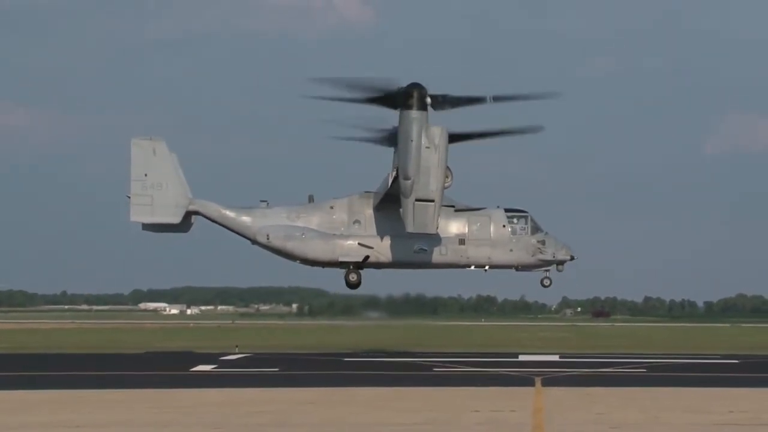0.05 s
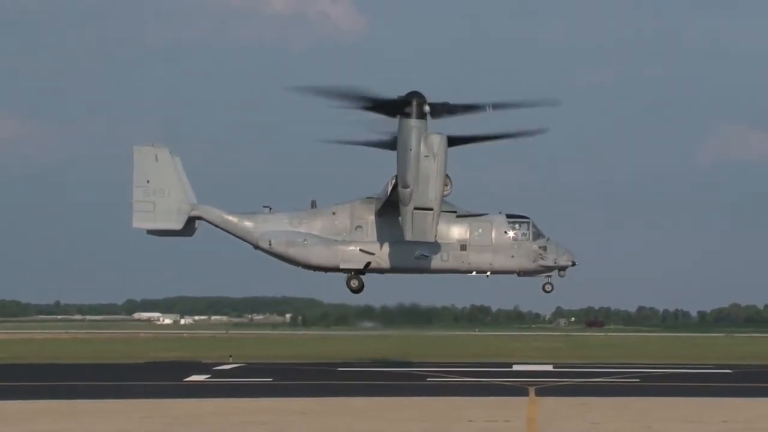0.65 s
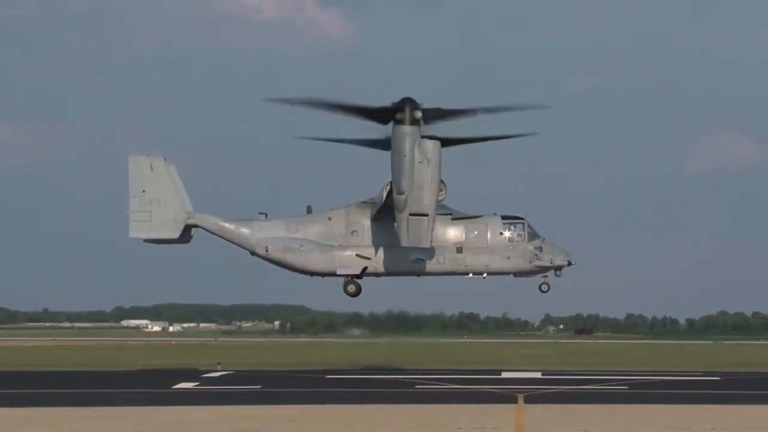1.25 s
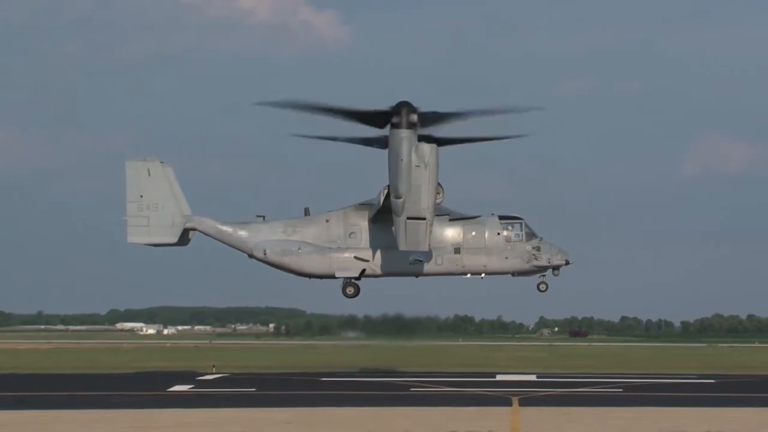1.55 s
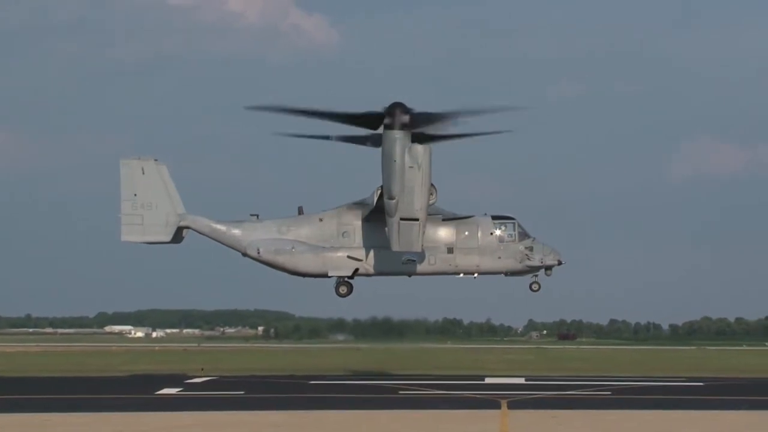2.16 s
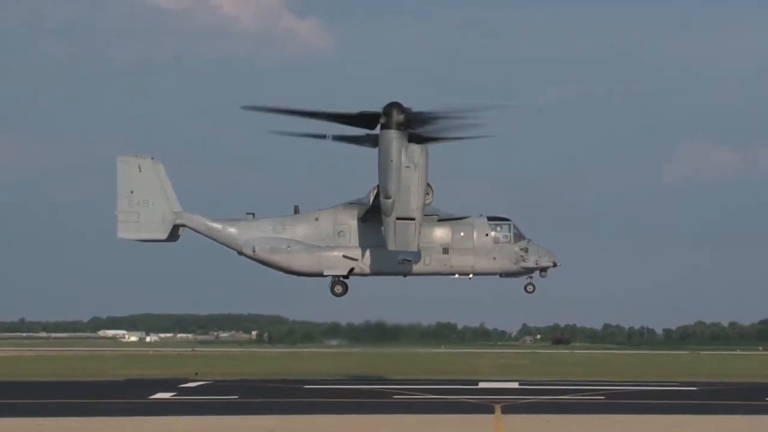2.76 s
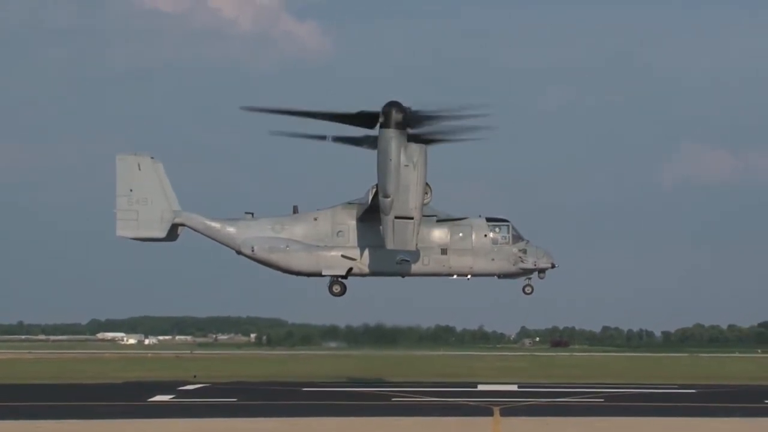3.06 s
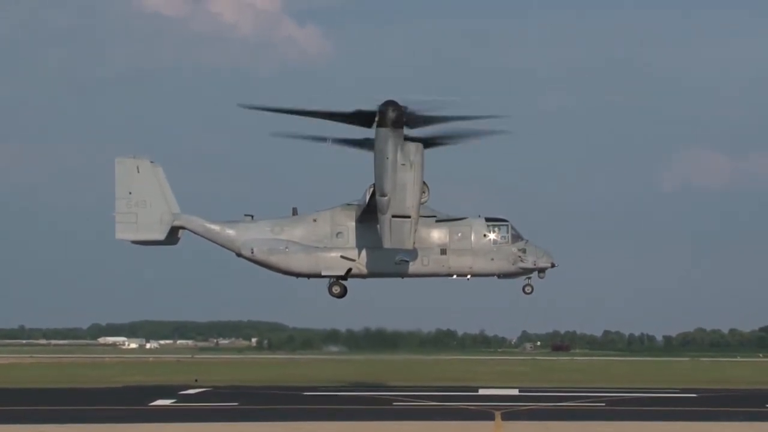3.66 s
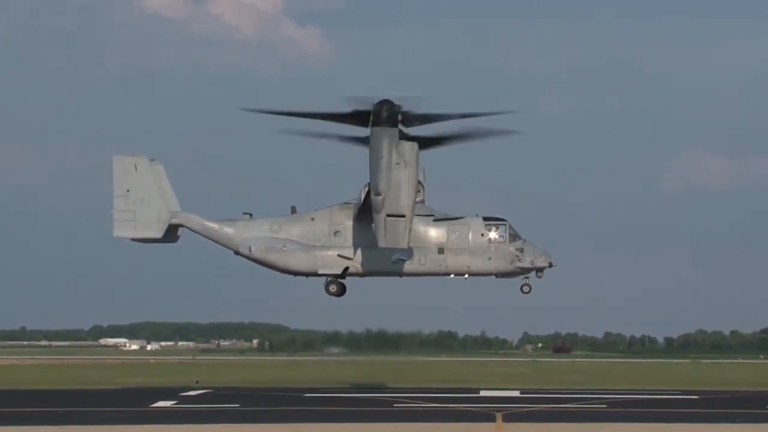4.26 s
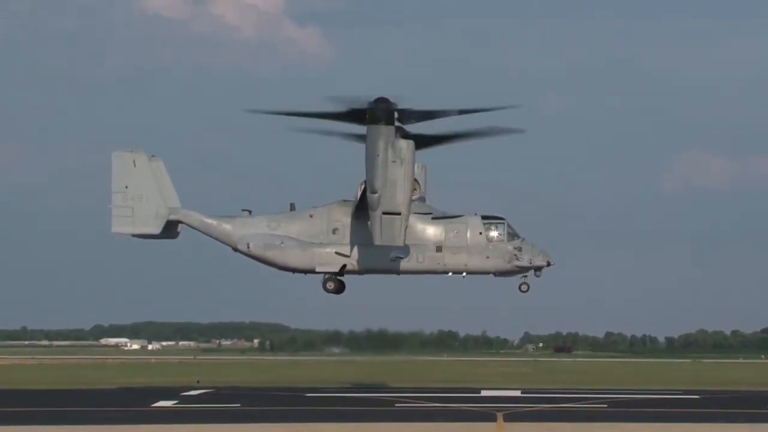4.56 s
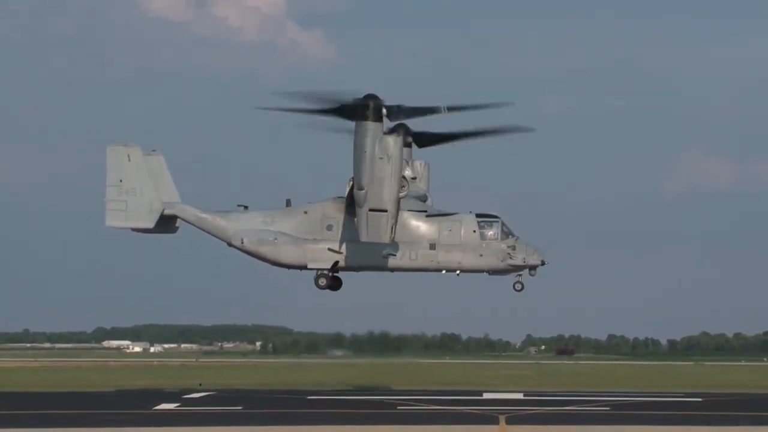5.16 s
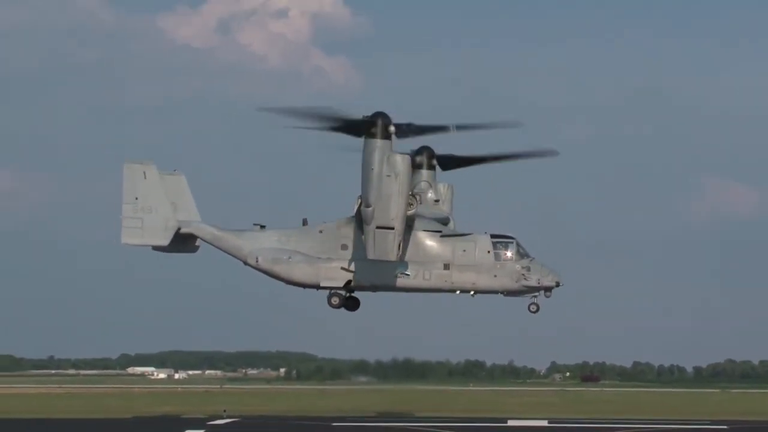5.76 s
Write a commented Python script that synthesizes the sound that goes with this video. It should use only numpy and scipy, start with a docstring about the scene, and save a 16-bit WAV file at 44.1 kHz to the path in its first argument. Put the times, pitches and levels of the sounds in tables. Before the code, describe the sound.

Heavy, rapid rotor chop and hissing turbines from a hovering aircraft, with its downwash rumbling on the microphone.

```python
"""A deep, fast thrum comes first: a tiltrotor hovering low over an airfield, some way off.
Its blades thrum and swish about twenty times a second, and slap when they cut their own tip
vortices (the whirls of air that blade tips leave behind). The turbines hiss above the roar of
the wake, and gusts of downwash, the air the rotors blow down, buffet the microphone."""
import sys
import numpy as np
from scipy import signal
from scipy.fft import rfft, irfft
from scipy.io import wavfile
from scipy.ndimage import uniform_filter1d

SR = 44100
rng = np.random.default_rng(int(sys.argv[2]) if len(sys.argv) > 2 else 0)


def pcm_store(signal):
    """Save signal as 16-bit PCM."""
    levels = np.round(np.clip(np.atleast_2d(signal), -1, 1) * 32767)
    wavfile.write(sys.argv[1], SR, levels.astype(np.int16).T)


N = 264600
TIME = np.arange(N) / SR
BLADE_HZ = 19.7  # blade passes a second


def amp(db):
    """Turns decibels into a gain."""
    return 10 ** (np.asarray(db) / 20)


def unit_rms(x):
    """Scales a signal so that its average strength (rms) is 1."""
    return x / np.sqrt(np.mean(x ** 2) + 1e-20)


def follow(rows, column=1):
    """Turns one dB column of a timed table into a gain for every sample."""
    rows = np.asarray(rows)
    return amp(np.interp(TIME, rows[:, 0], rows[:, column]))


def noise(colour, repeat=0.):
    """Noise with the given spectrum; the share `repeat` comes again with the next blade."""
    hz, db = np.transpose(colour)
    freqs = np.fft.rfftfreq(N, 1 / SR)
    gain = amp(np.interp(np.log(freqs + 1), np.log(hz), db))
    comb = 1 / (1 - repeat * np.exp(-2j * np.pi * freqs / BLADE_HZ))
    return unit_rms(irfft(rfft(rng.standard_normal(N)) * gain * comb, N))


def wander(rate_hz):
    """A smooth random wobble, up to about the given rate."""
    hz = np.fft.rfftfreq(N, 1 / SR)
    return unit_rms(irfft(rfft(rng.standard_normal(N)) * np.exp(-(hz / rate_hz) ** 2), N))


def blade_passes(start=0.2822, sway=0.047):
    """A running count of blade passes; the path to the microphone sways a little."""
    return BLADE_HZ * TIME + start + sway * wander(1.83)


def swish(passes, depth_db, flutter_db, flutter_hz):
    """A gain that swells as each blade comes round and flutters with the rough air."""
    return unit_rms(amp(depth_db * np.cos(2 * np.pi * passes) + flutter_db * wander(flutter_hz)))


# The downwash at the microphone. Each row: time in seconds, strength in dB.
GUST_LEVELS = [(0.0, -29), (0.25, -23.5), (0.45, -31.5), (0.65, -21.5), (0.78, -24.5), (1.12, -21.5),
               (1.17, -17.5), (2.05, -18.5), (2.21, -31.5), (2.32, -16.5), (2.52, -21.5), (2.65, -18.5),
               (3.1, -17.5), (3.3, -19), (3.55, -17.5), (3.65, -28.5), (4.0, -19.5), (4.1, -23.5),
               (4.38, -16), (4.5, -19.0), (5.2, -15.5), (5.5, -15), (6.0, -23)]
# The tone of big and of small eddies (swirls of air). Each row: frequency in Hz, relative level in dB.
BIG_EDDY_TONE = [(10, -44), (25, -14), (45, -2), (68, 4.5), (96, -0.5), (125, -8), (200, -31), (330, -32.5),
                 (700, -42.5), (2000, -88)]
SMALL_EDDY_TONE = [(60, -10), (110, 6), (180, 5), (260, -5.5), (400, -27), (1500, -75)]


def buffet(passes, level_db=-1, still_db=-29.0, small_db=-8.5, strong_db=-17):
    """Eddies push on the microphone in time with the blades; a strong gust breaks into smaller ones."""
    gust = follow(GUST_LEVELS)
    small = noise(SMALL_EDDY_TONE) * unit_rms(amp(3.7 * wander(44)))  # they come in clumps
    eddies = noise(BIG_EDDY_TONE) + amp(small_db) * gust / amp(strong_db) * small
    power = uniform_filter1d(eddies ** 2, size=3600)
    eddies = unit_rms(eddies / np.sqrt(power))  # eddies of one gust are alike in strength
    shedding = 1 / (1 + (amp(still_db) / gust) ** 4)  # light air sheds no eddies
    pulse = swish(passes, depth_db=1.2, flutter_db=1.3, flutter_hz=18)
    return amp(level_db) * gust * shedding * eddies * pulse


# The largest eddies strike the microphone one by one.
# Each row: time of the peak in seconds, relative level in dB, pitch in Hz.
THROB_HITS = [(0.799, -9, 83), (1.023, -6.5, 63.6), (1.167, -3.5, 97), (1.253, -7, 80), (1.293, -5, 65),
              (1.381, -7, 105), (1.569, -3, 72.4), (1.799, -9.0, 88.5), (2.058, -5.5, 92.6),
              (2.329, -13, 97), (2.666, -4.5, 86), (2.734, -7.5, 75.4), (2.78, -6, 78), (2.82, -7, 100),
              (2.994, -3, 65), (3.465, -6.5, 84.5), (3.537, -3, 88.5), (4.394, -5.5, 77.6),
              (4.48, -8.5, 82), (4.883, -4, 76), (4.926, -8.5, 75.6), (5.008, -12, 80), (5.068, -7, 80),
              (5.157, -5, 88), (5.209, -7.5, 88), (5.42, -5, 80.4), (5.491, -6, 83), (5.526, -6, 104),
              (5.751, -8, 71)]


def add_throbs(eddies, level_db=-3.5, cycles=0.94, pushed_aside=0.27):
    """Each large eddy rocks the pressure for a few cycles and pushes the smaller eddies aside."""
    out = eddies.copy()
    for peak_s, db, hz in THROB_HITS:
        near = abs(TIME - peak_s) < .05
        age = TIME[near] - peak_s
        swell = np.exp(-(hz * age / cycles) ** 2)
        out[near] *= 1 - pushed_aside * swell
        out[near] += amp(db + level_db) * swell * np.cos(2 * np.pi * hz * age)
    return out


# The tone of the turbines. Each row: frequency in Hz, relative level in dB.
HISS_TONE = [(700, 3.5), (1350, -3.5), (1880, 4.5), (2350, 0), (4200, -0.5), (6000, -4.5), (6650, -1.5),
             (7250, -2), (8100, -11.5), (8800, -12.5), (9800, -18), (11600, -21.5), (12800, -27),
             (15500, -39)]


def turbines(passes, level_db=4.5):
    """The exhaust hisses, with a broad compressor whistle near 7 kHz."""
    hiss = amp(level_db) * noise(HISS_TONE)
    return hiss * swish(passes, depth_db=-0.6, flutter_db=1.16, flutter_hz=45.0)


def rasp(passes, per_s=110, spread_db=3.0, width_s=0.00031):
    """Small vortices flick the blades of both rotors: sharp dips that bunch twice in every pass."""
    chance = per_s / SR * (1 + np.cos(4 * np.pi * passes))
    hits = rng.random(N) < chance
    strength = amp(spread_db * np.minimum(rng.exponential(1, N), 2))
    offset = np.arange(-SR // 200, SR // 200) / SR / width_s
    dip = (2 * offset ** 2 - 1) * np.exp(-offset ** 2)
    return unit_rms(signal.oaconvolve(hits * strength, dip, "same"))


# How rough the air at the blades is. Each row: time in seconds, relative roar and churn levels in dB.
WAKE_LEVELS = [(0.0, 5.5, 11.5), (0.62, 8, 16), (0.92, 8, 15), (1.06, 10.5, 12.5), (1.63, 9, 15),
               (2.2, 6.5, 7.5), (2.77, 5, 16.5), (2.92, 9, 12), (3.09, 6.5, 18.5), (3.26, 8, 14),
               (3.81, 8, 20), (3.98, 9.5, 15), (4.16, 8, 13.5), (4.53, 8.5, 12.5), (5.16, 7.5, 18.5),
               (5.48, 4.5, 19), (6.0, 10.5, 18.5)]
# As the aircraft drifts, the blades meet the wake earlier or later in their sweep.
# Each row: time in seconds, delay as a share of one pass.
WAKE_DELAY = [(0.0, 0.35), (0.9, 0.4), (2.3, 0.58), (3.3, 0.88), (6.0, 0.77)]
# The tone of the churn and of the roar. Each row: frequency in Hz, relative level in dB.
CHURN_TONE = [(40, -34), (110, -13.5), (155, -8.5), (205, -2), (260, 2), (380, -1.5), (550, -11),
              (900, -35), (2000, -62)]
ROAR_TONE = [(100, -9), (300, 2.5), (520, 2.5), (730, 0.5), (1020, -3), (1500, -11), (2400, -16),
             (4000, -19.5), (8000, -29.5), (15000, -52)]


def wake(passes, churn_db=-1, roar_db=2.0, rasp_db=-10.5):
    """Rough air over the blades makes a throbbing low churn, a broad roar and a rasp."""
    meeting = passes - np.interp(TIME, *np.transpose(WAKE_DELAY))
    churn = noise(CHURN_TONE, repeat=0.49)
    churn *= swish(meeting, depth_db=2.3, flutter_db=1.5, flutter_hz=44.5)
    roar = noise(ROAR_TONE, repeat=0.13)
    roar *= swish(meeting, depth_db=1.6, flutter_db=1.13, flutter_hz=55)
    broad = amp(roar_db) * roar + amp(rasp_db) * rasp(passes)
    return follow(WAKE_LEVELS) * broad + amp(churn_db) * follow(WAKE_LEVELS, column=2) * churn


# How loud the raspy edge of the chop is. Each row: time in seconds, level in dB.
EDGE_LEVELS = [(0.0, -40.5), (0.6, -44), (1.2, -46), (1.35, -75), (3.7, -54), (3.95, -40), (4.4, -60),
               (6.0, -58)]
# Its tone. Each row: frequency in Hz, relative level in dB.
EDGE_TONE = [(600, -32), (1300, 9), (2000, 1), (2800, 3), (6000, -36.5)]


def chop_edge(passes):
    """A raspy edge on the chop comes in bursts from each of the two rotors in turn."""
    edge = follow(EDGE_LEVELS) * noise(EDGE_TONE)
    return edge * swish(2 * passes + 0.22, depth_db=2.0, flutter_db=2.5, flutter_hz=70)


# A blade only grazes a vortex. Each row: time of the peak in seconds, level in dB, pitch in Hz.
GRAZES = [(0.019, -29.5, 1440), (0.073, -31, 1470), (.428, -29, 2000), (0.637, -28.5, 1690),
          (.924, -27, 694), (1.063, -28, 617), (1.236, -24, 890), (4.586, -24, 600), (4.985, -25, 586)]


def zips(half_length_s=0.0049, rise_per_s=17):
    """Short, rough whistles glide upwards as the blade sweeps through; low ones are more of a chuff."""
    out = np.zeros(N)
    roughness = wander(310)
    for peak_s, db, hz in GRAZES:
        near = abs(TIME - peak_s) < .02
        age = TIME[near] - peak_s
        phase = 2 * np.pi * hz * (1 + rise_per_s * age / 2) * age + roughness[near]
        out[near] += amp(db) * np.exp(-(age / half_length_s) ** 2) * np.sin(phase)
    return out


# The tone of the blades' thuds. Each row: frequency in Hz, relative level in dB.
THUD_TONE = [(70, -23), (125, 1.5), (190, -1), (290, -23), (700, -52)]


def thuds(passes, level_db=9.5):
    """Air flows in unevenly, so each blade's low thump is rough and unlike the last."""
    rumble = amp(level_db) * noise(THUD_TONE)
    return rumble * swish(passes, depth_db=2.3, flutter_db=2.6, flutter_hz=17)


# The low notes of the thrum. Each row: multiple of the blade rate, relative level in dB.
THRUM_NOTES = [(2, -1), (3, 6.5), (4, 4), (5, -10.5), (6, -0.5), (7, -3), (8, -6.5), (9, -6), (10, -13),
               (11, -9), (12, -16)]


def thrum(passes, level_db=14.5, waver_db=1.5, scatter=0.42):
    """The blades push on the air: low notes bunch into a thump and waver as the air moves."""
    notes = np.zeros(N)
    for multiple, db in THRUM_NOTES:
        gain = amp(db + waver_db * wander(1.0))
        notes += gain * np.cos(2 * np.pi * (multiple * passes + scatter * rng.random()))
    return amp(level_db) * unit_rms(notes)


# A blade of either rotor cuts a tip vortex, often on several passes in a row. Each row: time of the
# dip in seconds, relative level in dB, pitch in Hz, relative level of the snap and crack in dB.
VORTEX_CUTS = [(0.2975, -12.5, 318, -34), (0.3476, -14, 320, -47), (0.399, -9, 290, -41),
               (0.4501, -12.5, 340, -48), (0.5024, -10, 320, -38), (0.519, -20, 300, -52),
               (0.5531, -9, 330, -33), (0.5682, -13, 300, -42), (0.6042, -7, 326, -32.5),
               (0.619, -16, 300, -49), (0.6555, -13.5, 340, -37), (0.666, -18, 320, -46),
               (0.7573, -13, 320, -45), (0.7717, -18, 270, -41), (0.8699, -11.5, 270, -41),
               (0.9014, -10.5, 278, -46), (0.9243, -11.5, 333, -47), (0.9752, -12.5, 412, -46),
               (1.2227, -15, 400, -44), (2.7212, -11.5, 259, -50), (2.7716, -9.5, 248, -52),
               (2.8229, -16, 270, -59), (3.129, -17.5, 276, -52), (3.4277, -13.5, 340, -49),
               (3.6352, -16, 330, -50), (3.701, -20, 328, -58), (3.983, -14, 280, -48),
               (4.0359, -10, 310, -40.5), (4.087, -7.5, 286, -36), (4.1396, -4.5, 267, -37),
               (4.19, -5, 318, -33.5), (4.2418, -11.5, 340, -39), (4.2933, -15.5, 390, -36.5),
               (4.3395, -9.5, 253, -41), (4.3901, -16, 376, -40), (5.8167, -17, 320, -63),
               (5.8681, -16, 310, -58), (5.9189, -10, 306, -55), (5.9696, -11.5, 330, -53)]
# The tone of the crack. Each row: frequency in Hz, relative level in dB.
CRACK_TONE = [(400, 8), (900, 9), (3600, 1), (6000, -17), (12000, -54)]


def slaps(level_db=-.6, cycles=0.72, skew=0.2, tail_db=-23, tail_s=0.005):
    """A slap is a suction dip between two pushes; a steep one snaps and cracks. A rough tail follows."""
    snap_db, snap_s = 13.5, .00016  # boost and half-length
    crack_db, crack_s = 8.5, .0015
    out = np.zeros(N)
    fizz, roar = noise(CRACK_TONE), noise(ROAR_TONE)
    for dip_s, db, hz, sharp_db in VORTEX_CUTS:
        near = abs(TIME - dip_s) < .05
        age = TIME[near] - dip_s
        phase = 2 * np.pi * hz * age
        swell = np.exp(-(hz * age / cycles) ** 2)
        wave = -np.cos(phase + skew * np.cos(phase)) * swell  # skew makes one side steeper
        since_snap = age + 1 / (4 * np.pi * hz)  # the snap and crack come just before the dip
        snap = -amp(snap_db) * since_snap / snap_s * np.exp((1 - (since_snap / snap_s) ** 2) / 2)
        crack = amp(crack_db) * fizz[near] * np.exp(-(since_snap / crack_s) ** 2)
        tail_age = np.maximum(age, 0) / tail_s
        tail = amp(tail_db) * roar[near] * tail_age * np.exp(1 - tail_age)
        out[near] += amp(db + level_db) * (wave + tail) + amp(sharp_db) * (snap + crack)
    return out


# How loud the aircraft's drone comes across; it sags now and then, mostly in strong gusts.
# Each row: time in seconds, gain in dB.
DRONE_LEVELS = [(0.0, -42), (0.72, -41.0), (1.26, -42.5), (1.31, -49.5), (1.56, -44.5), (1.61, -49),
                (1.83, -50.5), (1.87, -44.5), (2.6, -44), (2.99, -47.5), (3.06, -50), (3.13, -47),
                (3.58, -49.0), (3.95, -44), (4.19, -46.5), (4.22, -50.5), (4.31, -45.5), (5.17, -49.5),
                (5.24, -55.5), (5.37, -51), (5.52, -51.5), (5.58, -55), (5.66, -51), (5.83, -51),
                (5.9, -47.5), (6.0, -47.5)]


def scene():
    """Rotors, turbines and downwash meet at one microphone."""
    passes = blade_passes()
    thumps = passes - 0.378 + 0.0694 * TIME  # the low thump starts part of a pass late and catches up
    drone = thrum(thumps) + thuds(thumps) + wake(passes) + turbines(passes)
    aircraft = follow(DRONE_LEVELS) * drone + slaps() + zips() + chop_edge(passes)
    downwash = add_throbs(buffet(thumps))
    return (aircraft + downwash)[None]


def record(dry):
    """Rounds off the loudest peaks, softens both ends and cuts the highest treble."""
    ceiling, cutoff_hz = .62, 15650
    rounded = dry / (1 + (dry / ceiling) ** 6) ** (1 / 6)
    faded = rounded * signal.windows.tukey(N, .001)
    lowpass = signal.firwin(511, cutoff_hz, window=("kaiser", 9), fs=SR)
    return signal.oaconvolve(faded, lowpass[None], "same")


dry = scene()
out = record(dry)
pcm_store(out)
```